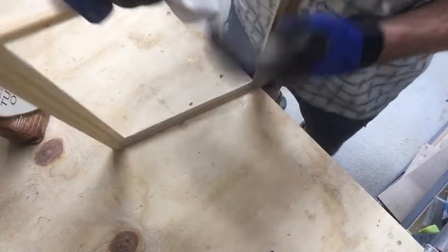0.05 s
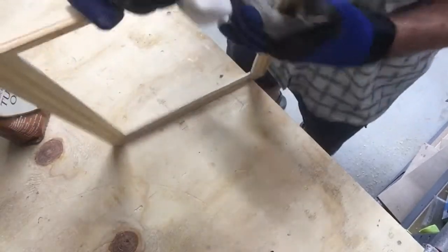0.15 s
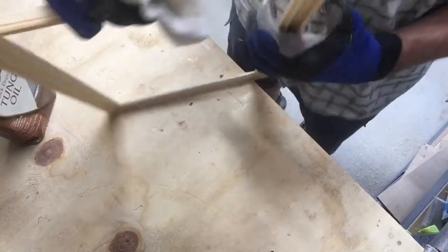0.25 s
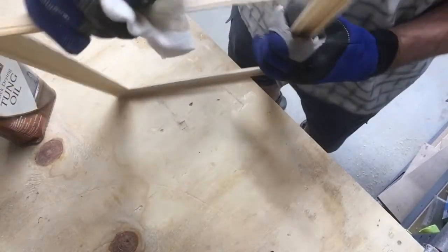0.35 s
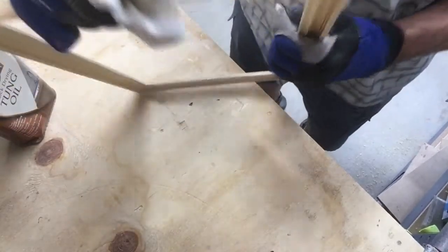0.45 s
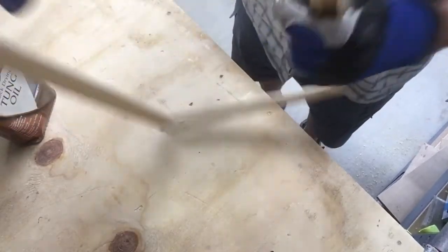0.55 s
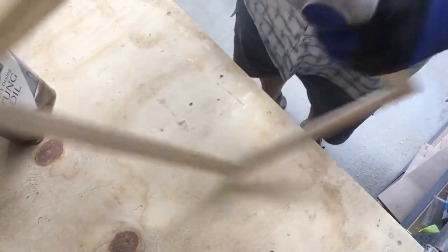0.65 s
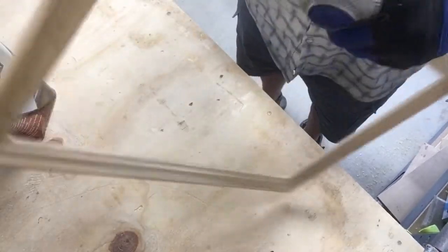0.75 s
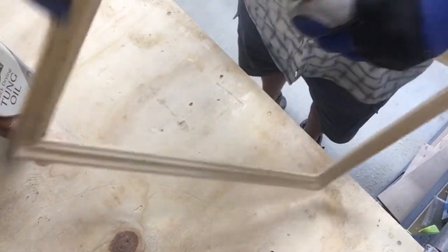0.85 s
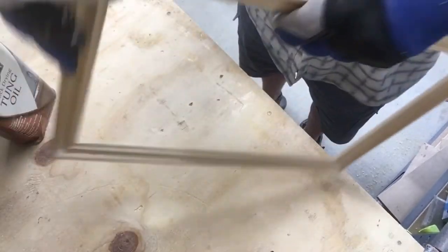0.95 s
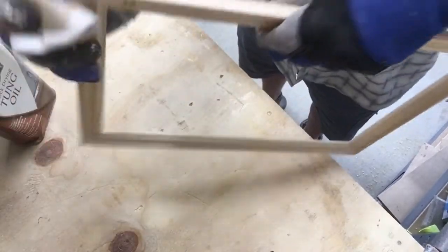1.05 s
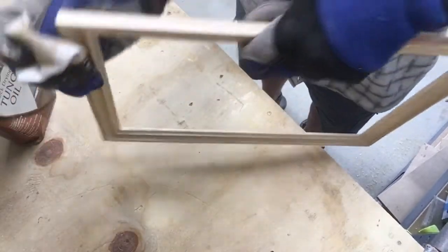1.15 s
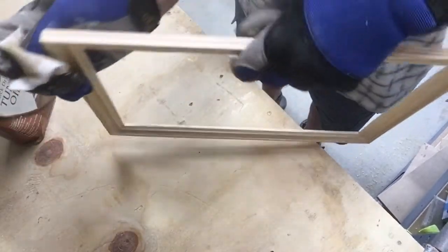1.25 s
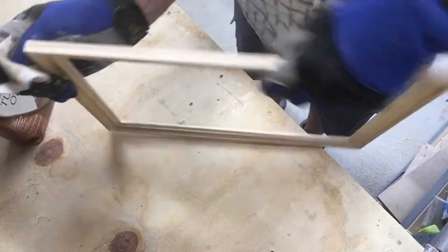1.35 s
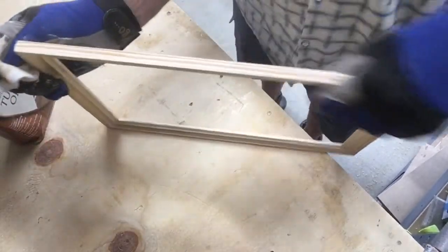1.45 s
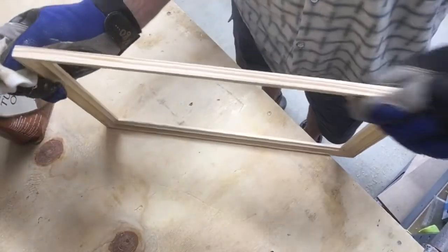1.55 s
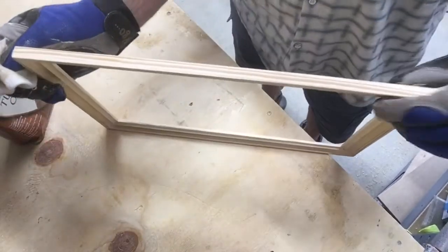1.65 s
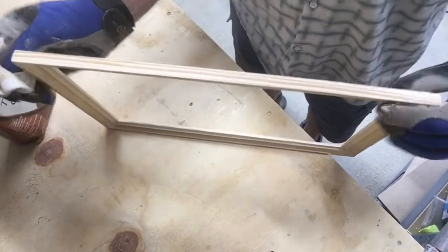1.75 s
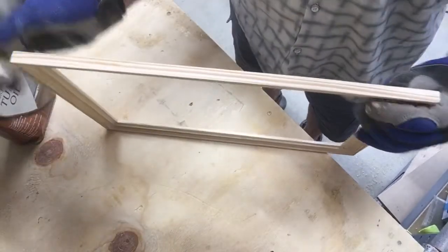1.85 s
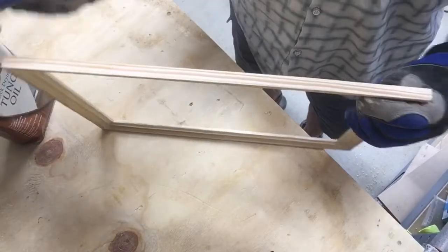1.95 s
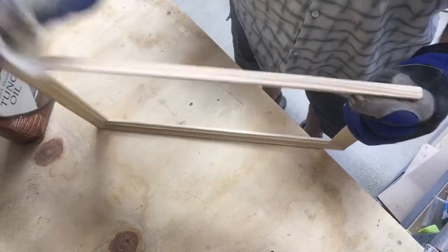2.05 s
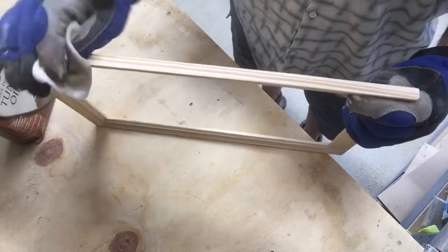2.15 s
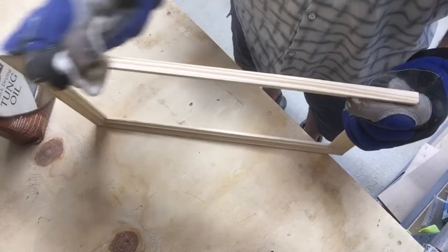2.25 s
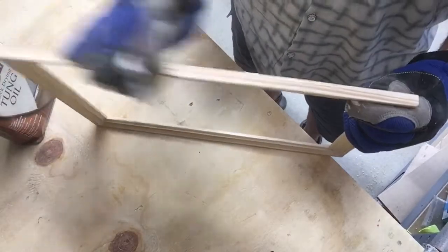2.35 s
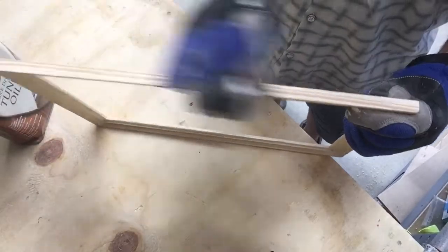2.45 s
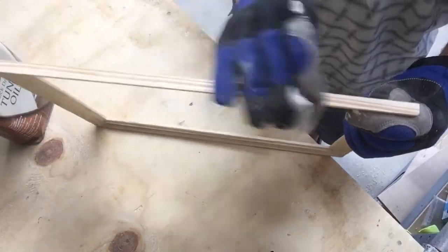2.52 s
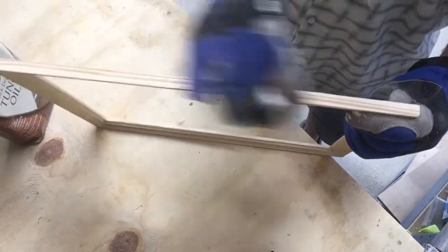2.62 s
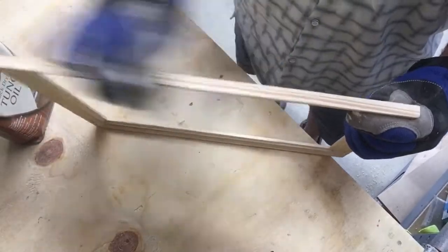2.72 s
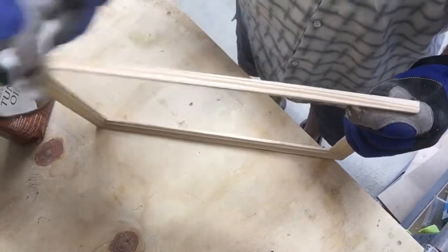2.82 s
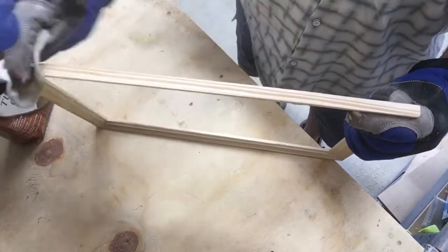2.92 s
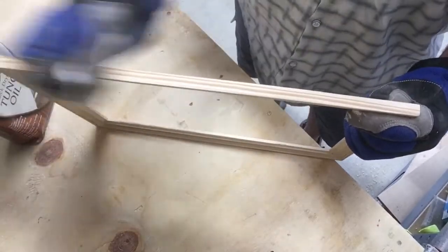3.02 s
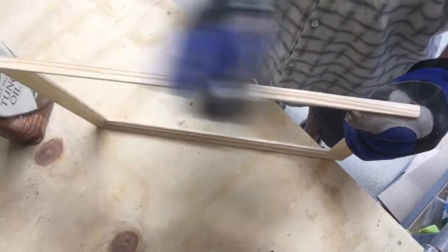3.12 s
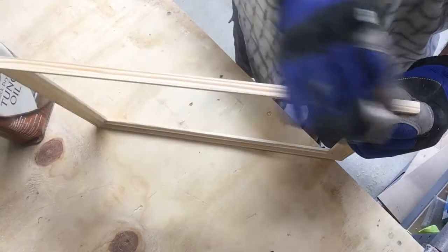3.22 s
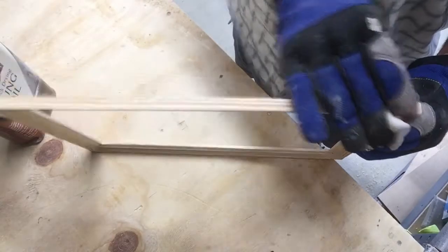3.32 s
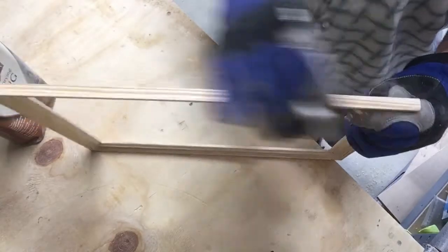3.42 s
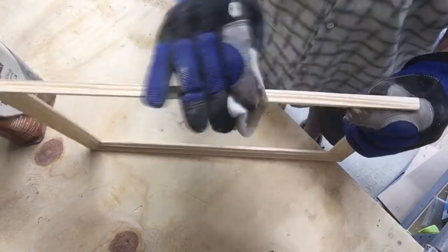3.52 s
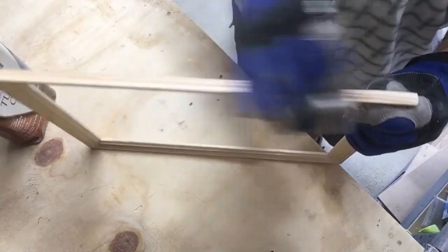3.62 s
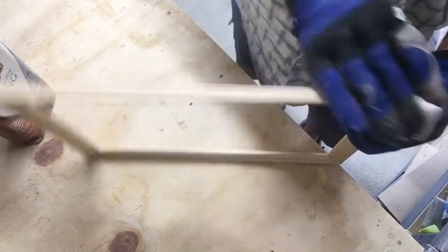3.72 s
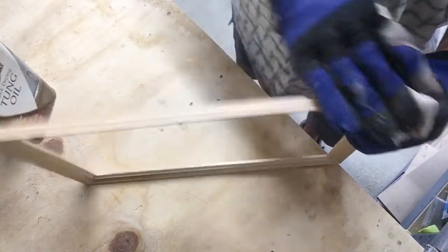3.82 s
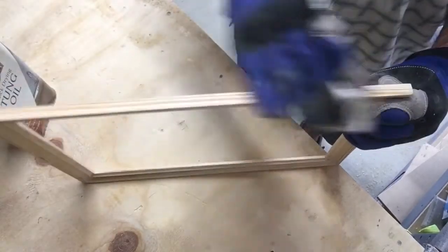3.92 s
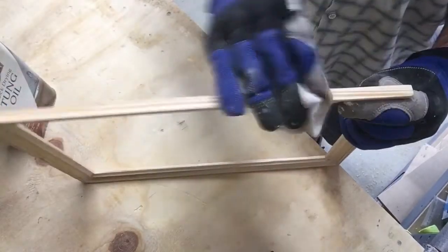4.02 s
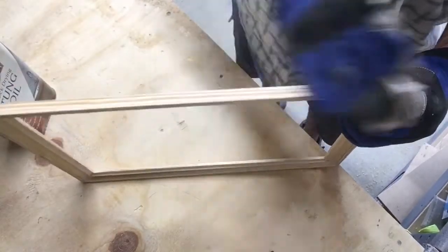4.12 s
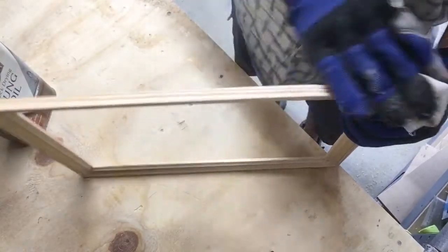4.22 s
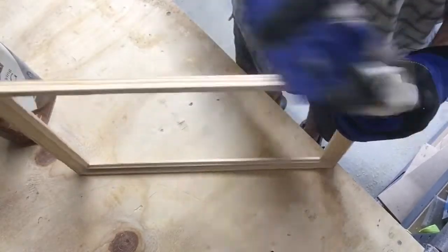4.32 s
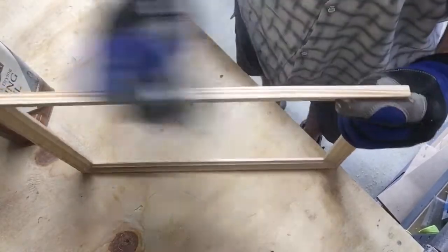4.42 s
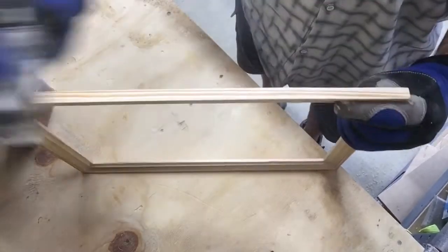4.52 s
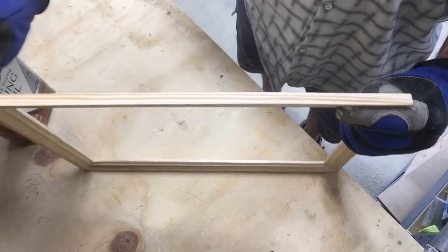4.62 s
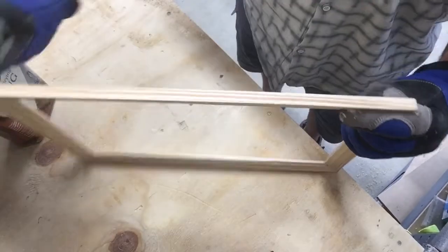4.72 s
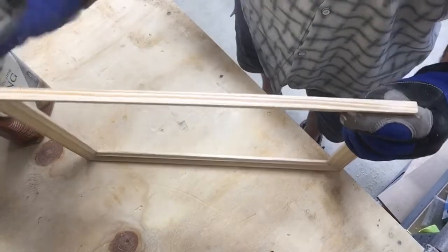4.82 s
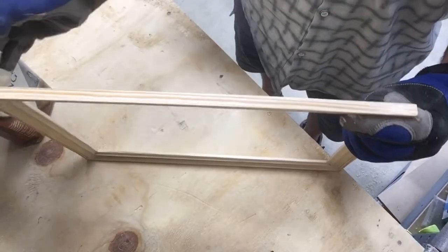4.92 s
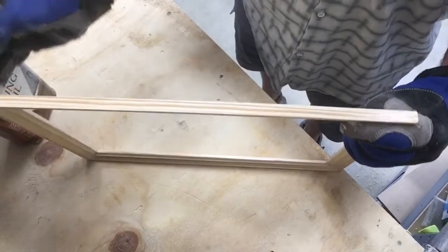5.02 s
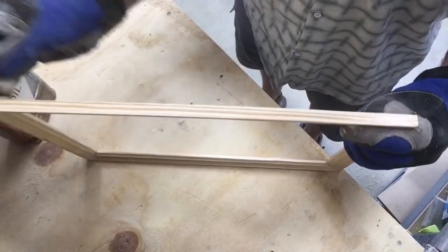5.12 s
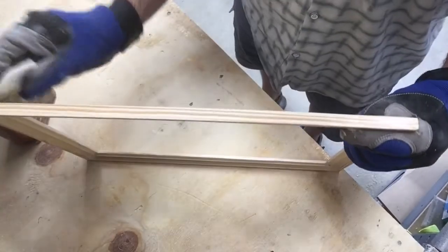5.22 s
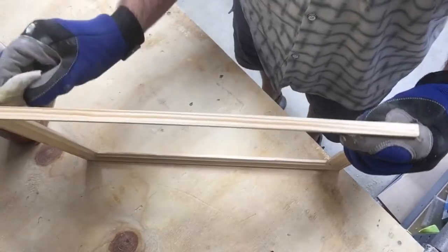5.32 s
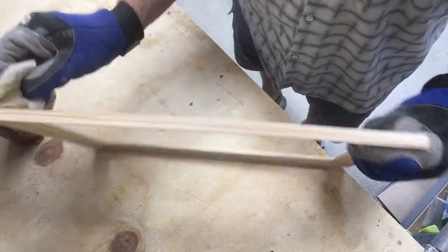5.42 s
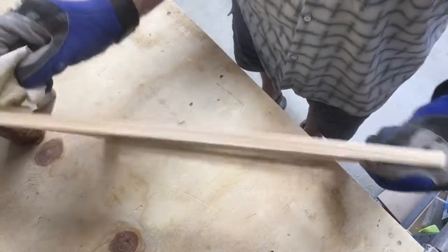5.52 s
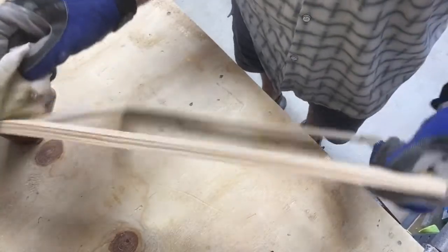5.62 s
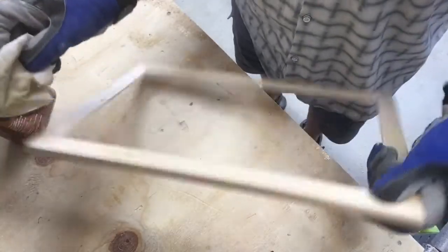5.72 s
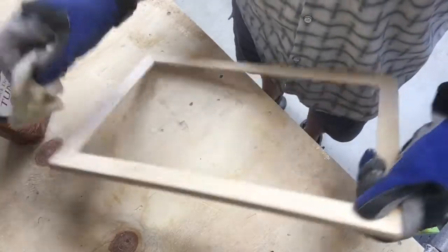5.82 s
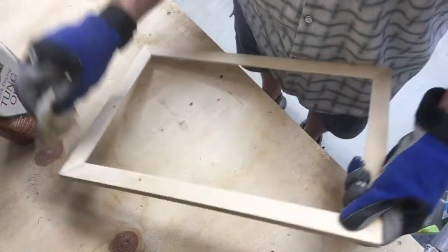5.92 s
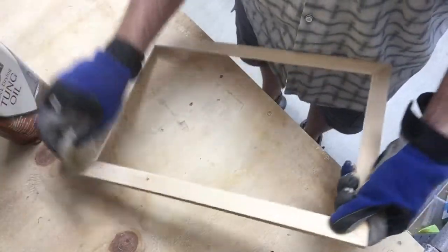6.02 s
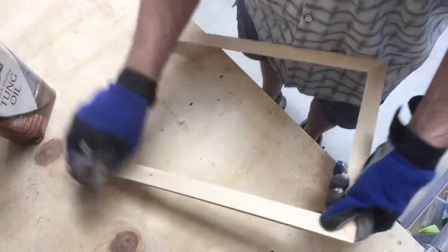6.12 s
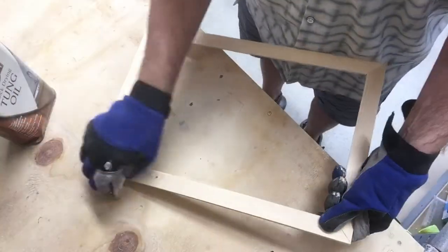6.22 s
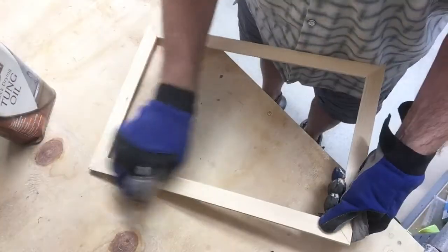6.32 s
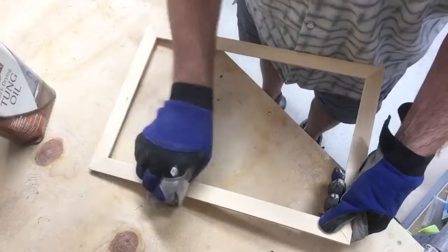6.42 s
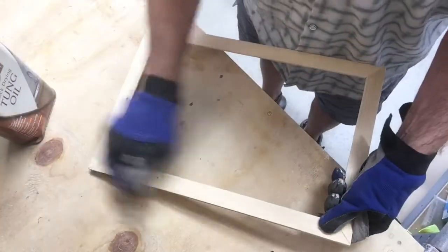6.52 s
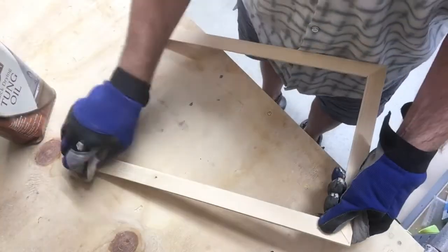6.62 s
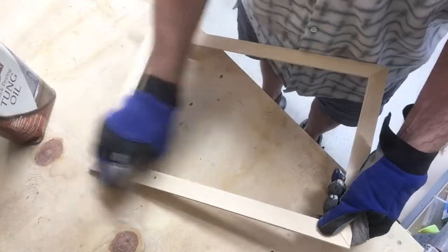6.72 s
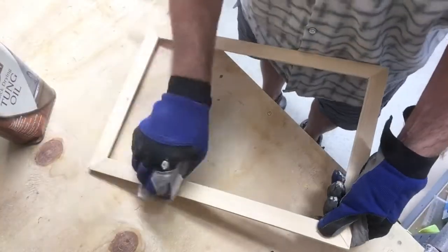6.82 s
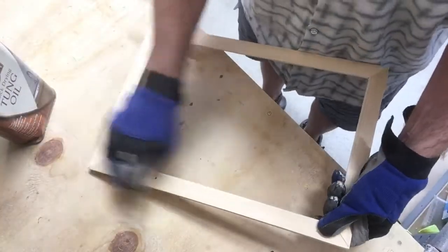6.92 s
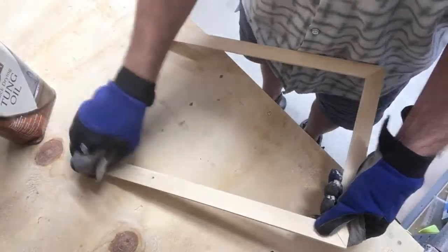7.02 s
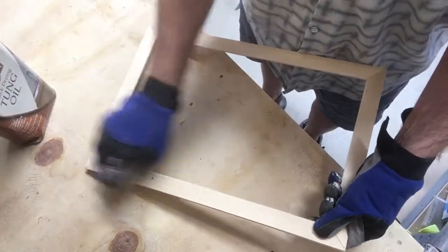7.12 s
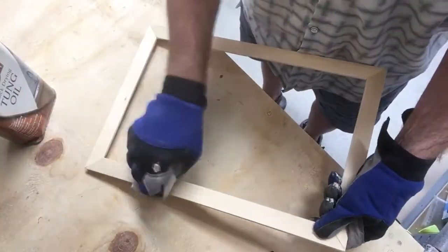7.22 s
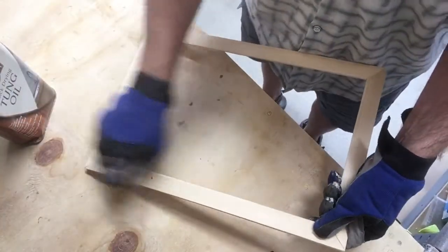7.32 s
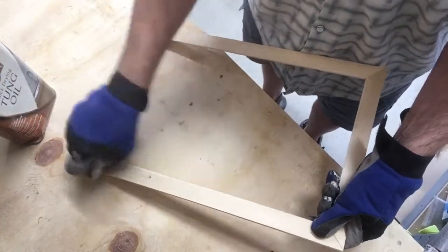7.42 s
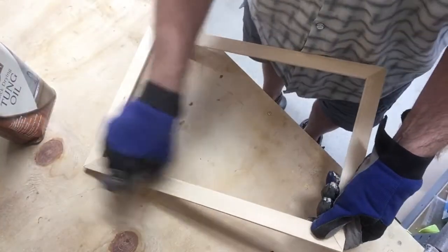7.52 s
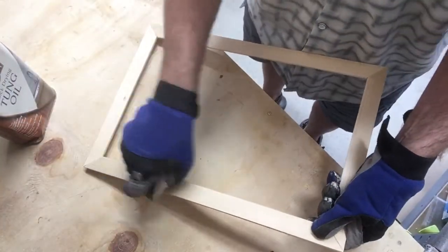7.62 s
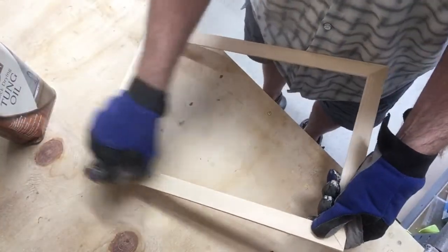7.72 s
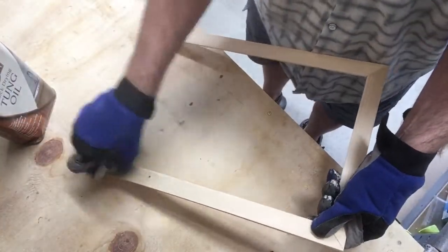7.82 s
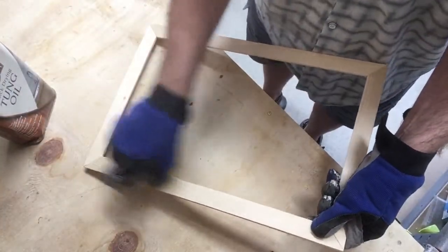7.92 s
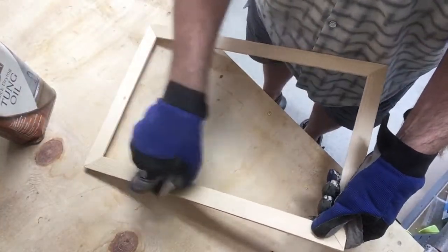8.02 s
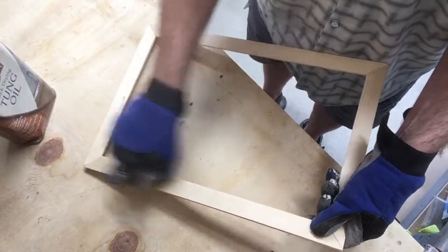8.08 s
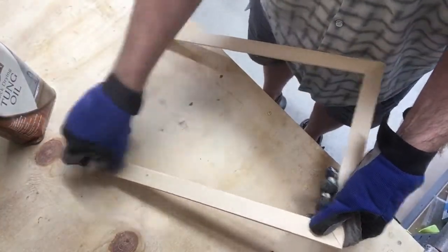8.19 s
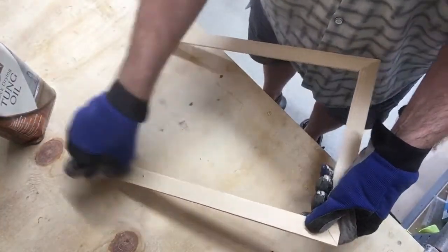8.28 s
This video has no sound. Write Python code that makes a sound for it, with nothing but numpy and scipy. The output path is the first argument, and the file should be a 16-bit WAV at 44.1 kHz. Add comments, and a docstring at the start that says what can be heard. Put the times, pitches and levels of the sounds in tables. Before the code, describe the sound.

A light wooden frame clatters and scrapes on a plywood bench while a rag wipes it, slow strokes at first, then brisk back-and-forth rubbing.

```python
"""Wooden knocks and a scraping slide come first; then a gloved hand wipes an oily rag to and fro along a
light wooden frame on a plywood bench. Rag, drag and narrow bands are noise shaped by filters and resonances.
The frame knocks on the bench as it is turned, each knock a burst of decaying modes; the bench booms under it.
A quiet workshop answers well under the direct sound, over still air and a low wavering drone."""
import sys
import numpy as np
from scipy import signal
from scipy.fft import rfft, irfft, next_fast_len
from scipy.io import wavfile
from scipy.ndimage import uniform_filter1d, map_coordinates

SR = 44100
rng = np.random.default_rng(int(sys.argv[2]) if len(sys.argv) > 2 else 0)


def elevation(decibels):
    """Turn decibel levels (scalar or array-like) into linear amplitude ratios."""
    levels = np.asarray(decibels, float)
    return 10 ** (levels / 20)


def master_out(mix):
    """Clip the mix to full scale and print it as 16-bit PCM to the path in sys.argv[1]."""
    frames = np.transpose(np.atleast_2d(mix))
    ceiling = np.clip(frames, -1, 1)
    pcm = np.round(ceiling * 32767).astype(np.int16)
    wavfile.write(sys.argv[1], SR, pcm)


N = 368235  # samples

# modes of the plywood bench top, lowest first: pitch_hz [Hz], level_db [dB], t60_s [s]
TOP_MODES = [(64.7, -21, 0.54), (185, 0, 0.17), (242.5, -13, 0.31), (273.2, 5.5, 0.041), (288.2, 1.5, 0.11),
             (308.5, -6, 0.12), (341, -8, 0.1), (411.7, -8.5, 0.19)]
# modes of the frame's struck corner: pitch_hz [Hz], level_db [dB], t60_s [s]
CORNER_MODES = [(443, -4.5, 0.046), (534.5, 4.5, 0.053), (590, 6, 0.058), (611, 2.5, 0.067),
                (755, 1.5, 0.062), (832, 3, 0.067)]
# modes of the frame's bars: pitch_hz [Hz], level_db [dB], t60_s [s]
FRAME_MODES = [(941.5, 0.5, 0.078), (1051, -7, 0.055), (1175, -2.5, 0.032), (1420, -5.5, 0.021),
               (1578, 0, 0.035), (1695, -4, 0.053), (1778, -1.5, 0.035), (1955, -14, 0.017),
               (1926, -1.5, 0.0097), (2175, 0, 0.028), (2344, -9.5, 0.034), (2840, -14.5, 0.015),
               (3134, -5, 0.047), (3740, -5.5, 0.016), (4070, -2, 0.015)]
# strokes of the rag along a bar: start_s [s], length_s [s], level_db [dB, midway], swell_db [dB, start to end]
WIPE_STROKES = [(2.17, .33, -46, 9), (2.577, 0.22, -43, 0.5), (2.925, 0.3, -43, 1),
                (3.319, 0.16, -45, -1.5), (3.525, 0.16, -45, 5), (3.801, 0.15, -45, -0.5),
                (4.02, 0.12, -45.5, -3), (4.245, 0.32, -42, 1.5), (6.257, 0.14, -46.5, 8),
                (6.48, 0.12, -40.5, 4.5), (6.657, 0.15, -41.5, -3.5), (6.872, 0.13, -41, 4.5),
                (7.064, .14, -42.5, 1.5), (7.275, 0.12, -41.5, 1.5), (7.451, .14, -43, -5),
                (7.653, .12, -43, 3), (7.844, 0.15, -44, 0.5), (8.049, 0.12, -42.5, 3),
                (8.279, 0.074, -45, 1)]

LAID_FLAT_S = 5.8  # the frame stands on edge before, lies flat after
TOP_LOW_HZ = 174  # the top radiates little below this
STOP_DB = -18  # level just after a movement stops, against its end


def unit(x):
    """Scaled to rms 1."""
    return x / np.sqrt(np.mean(x ** 2) + 1e-20)


def along(points, hz):
    """(Hz, value) points read on a log frequency axis."""
    f, v = np.transpose(points)
    return np.interp(np.log(hz + 1), np.log(f + 1), v)


def wobble(rate):
    """A smooth random curve, rate knots a second."""
    knots = rng.standard_normal(int(N * rate / SR) + 4)
    return map_coordinates(knots, [np.arange(N) * rate / SR])


def filtered(x, response):
    """x times a complex response of frequency."""
    m = next_fast_len(N + SR // 2)
    return irfft(rfft(x, m) * response(np.fft.rfftfreq(m, 1 / SR)), m)[:N]


def resonant(modes, damping):
    """Response of a body under steady friction; damping multiplies the free bandwidth of its modes."""
    def response(f):
        total = 0
        for k, (hz, db, t60) in enumerate(modes):
            width = damping * np.log(1000) / np.pi / t60
            total = total + (-1) ** k * elevation(db) * 1j * f * width / (hz * hz - f * f + 1j * f * width)
        return total
    return response


def friction(grain_db, patchy_db):
    """Many tiny slips of uneven size; narrow bands swell and fade as the contact moves along the wood."""
    slips = rng.standard_normal(N) * elevation(grain_db * wobble(1500))
    z = signal.stft(slips, nperseg=1024)[2]
    field = uniform_filter1d(rng.standard_normal(z.shape), size=4, axis=0)
    field = uniform_filter1d(field, size=6, axis=1)
    return signal.istft(z * elevation(patchy_db * unit(field)), nperseg=1024)[1][:N]


def strokes(rows, slower=1, stop_db=STOP_DB):
    """Amplitude of a table of movements: each speeds up, travels, slows to a stop and rustles on faintly."""
    rise_s, stop_s, rustle_s = 0.012 * slower, 0.047 * slower, 0.66
    arch_db, silent_db = 3, -36  # midway over the ends; before the rise, under the start
    power, t = 0, np.arange(0, N / SR, 0.001)
    for start, length, db, swell_db in rows:
        rise, stop = min(rise_s, length / 3), min(stop_s, length * 2.6)
        first, last = db - swell_db / 2 - arch_db, db + swell_db / 2 - arch_db
        times = start + np.array([-3 * rise, 0, length / 2, length, length + stop, length + stop + rustle_s])
        levels = [first + silent_db, first, db, last, last + stop_db, last + stop_db - 39]
        power += elevation(np.interp(t, times, levels, left=-120, right=-120)) ** 2
    return np.interp(np.arange(N) / SR, t, np.sqrt(power))


def shop(x):
    """The workshop's answer: delayed noise in which each frequency dies at its own speed."""
    # decay of the room: frequency_hz [Hz], t60_s [s]
    room_decay = [(200, 0.33), (2000, 0.15), (10000, 0.055)]
    hz, t, z = signal.stft(rng.standard_normal(SR // 2), SR, nperseg=256)
    tail = signal.istft(z * elevation(-60 * t / along(room_decay, hz)[:, None]), SR, nperseg=256)[1]
    late = np.pad(x, (300, 0))  # samples
    return signal.fftconvolve(late, tail / np.linalg.norm(tail))[:len(x)]


def still_air():
    """The room's still air: steady noise with a fixed spectrum."""
    # spectrum of the air: frequency_hz [Hz], level_db [dB, relative]
    air_spectrum = [(25, -14.5), (84, -2.5), (145, -17.5), (317, -14), (600, -21), (1100, -20.5),
                    (2500, -23.5), (4500, -28.5), (8000, -35.5), (16000, -42)]
    noise = filtered(rng.standard_normal(N), lambda f: elevation(along(air_spectrum, f)))
    return elevation(-61) * unit(noise)


def sway():
    """The lowest bench mode hums at each shove; a deeper, wavering drone comes and goes below it."""
    # shoves that set the bench swaying: start_s [s], length_s [s], level_db [dB, midway]
    shoves = [(-0.007, 0.089, -40.5), (0.33, 0.17, -53), (1.362, 0.18, -46), (2.037, 0.164, -53.5),
              (2.888, 0.077, -54), (3.051, 0.036, -60), (3.135, 0.11, -60), (3.3, 0.33, -50),
              (3.771, 0.19, -48), (4.058, 0.027, -48), (4.11, 0.039, -50), (4.229, 0.15, -42),
              (4.508, 0.039, -61), (4.597, 0.34, -51), (5.227, 0.044, -57), (5.406, 0.044, -53),
              (5.825, 0.25, -43.5), (6.15, 0.19, -50), (6.996, 0.12, -58), (8.19, 0.035, -54)]
    # swells of the drone: start_s [s], length_s [s], level_db [dB, midway], swell_db [dB, start to end]
    drones = [(.7, 0.21, -60, 4), (2.9, .1, -58, -4), (3.3, 0.29, -63, 2), (4.25, .2, -59, -2),
              (5.1, 0.6, -54, 0), (5.9, .25, -45, -4), (6.3, 0.47, -47.5, -3)]
    hum_rest_db, drone_rest_db = -66, -77
    shove_fade_db = -9.5  # from start to end of a shove
    hum_size = elevation(hum_rest_db) + strokes([(*row, shove_fade_db) for row in shoves], slower=1.45)
    drone_size = elevation(drone_rest_db) + strokes(drones, slower=5.1)
    hum_hz = TOP_MODES[0][0] + 2.38 * wobble(7.1)
    hum = np.sin(2 * np.pi * np.cumsum(hum_hz) / SR) * elevation(3.1 * wobble(6.8))
    drone_hz = 33 + 1.25 * wobble(1.7)
    drone = np.sin(2 * np.pi * np.cumsum(drone_hz) / SR) * elevation(1.2 * wobble(4.6))
    return hum_size * unit(hum) + drone_size * unit(drone)


def narrow_bands():
    """Narrow bands of noise: high squeaks, soft low thumps and the dull ends of strokes."""
    # narrow bands: start_s [s], length_s [s], level_db [dB, midway], pitch_hz [Hz]
    band_table = [(.048, 0.052, -42.5, 2100), (0.062, 0.034, -42.5, 4270), (0.205, 0.038, -47, 4060),
                  (.285, 0.032, -47, 3300), (.335, 0.032, -53, 2200), (3.284, 0.095, -44.5, 185),
                  (4.67, 0.056, -41, 185), (4.553, .015, -55, 1180), (4.574, .01, -46, 1550),
                  (5.35, 0.047, -56, 2700)]
    half_width = 0.038  # over the pitch
    noise = rng.standard_normal(N)
    out = np.zeros(N)
    for start, length, db, hz in band_table:
        tone = filtered(noise, lambda f: 1 / (1 + ((f - hz) / (half_width * hz)) ** 4))
        out += strokes([(start, length, db, 0)], slower=0.32, stop_db=-40) * unit(tone)
    return out


def drag():
    """Wood juddering on wood drives the modes of bench top and frame."""
    # the frame sliding and rocking: start_s [s], length_s [s], level_db [dB, midway], swell_db [dB, start to end]
    slide_table = [(0, 0.034, -30, -15), (.07, 0.06, -33, -9), (.17, 0.18, -29, -17), (.35, 0.032, -46, -5),
                   (1.42, 0.052, -43.5, 7.5), (1.85, 0.17, -49.5, 5.5), (2.1, 0.15, -50, -8),
                   (2.89, 0.028, -53, -16), (3.28, 0.34, -60.5, -25), (4.56, 0.24, -49.5, 3.5),
                   (5.2, 0.11, -55, 4), (5.34, 0.052, -46, -2), (5.95, 0.05, -38.5, 5),
                   (6.06, 0.092, -48.5, 1), (8.18, 0.045, -49, 4), (8.32, 0.035, -49, 17)]
    slide_scrape_db = -16.5  # frame under bench top in a slide
    wipe_drag_db, wipe_scrape_db = -15, -18.5  # top and frame under the wiping that rocks the frame
    flat_db = -4.5  # lying flat, the frame rocks less
    judder_db, judder_hz = 2, 25
    slides = strokes(slide_table, slower=2.05)
    lying = np.arange(N) >= LAID_FLAT_S * SR
    wipes = strokes(WIPE_STROKES) * elevation(np.where(lying, flat_db, 0))
    drag_size = slides + elevation(wipe_drag_db) * wipes
    scrape_size = elevation(slide_scrape_db) * slides + elevation(wipe_scrape_db) * wipes

    top = filtered(friction(grain_db=-0.5, patchy_db=4.0), resonant(TOP_MODES[1:], damping=0.85))
    # a second, more damped pass brings the same modes out further
    top = filtered(top, resonant(TOP_MODES[1:], damping=3.56))
    top = filtered(top, lambda f: 1 / (1 + (TOP_LOW_HZ / (f + 1)) ** 8))
    top = elevation(judder_db * wobble(judder_hz)) * top
    frame_modes = CORNER_MODES + FRAME_MODES[:4]
    frame = filtered(friction(grain_db=4.0, patchy_db=-1.0), resonant(frame_modes, damping=7.5))
    frame = elevation(1.1 * wobble(35)) * frame
    return drag_size * unit(top) + scrape_size * unit(frame)


def peak(x):
    """Scaled to a peak of 1."""
    return x / np.max(abs(x))


def band(x, lo_hz, hi_hz):
    """x through a gentle band-pass."""
    return signal.sosfilt(signal.butter(2, [lo_hz, hi_hz], "band", fs=SR, output="sos"), x)


def ring(modes, push):
    """Decaying modes struck by a push; each mode's strength and pitch vary a little at random from knock to knock."""
    t = np.arange(SR // 3) / SR
    spread_db, detune = 2.5, 0.007  # detune is a fraction of the pitch
    tones = 0
    for hz, db, t60 in modes:
        decay = elevation(db + rng.normal(0, spread_db) - 60 * t / t60)
        tones = tones + decay * np.sin(2 * np.pi * hz * rng.normal(1, detune) * t)
    return signal.fftconvolve(tones, push)


def knocks():
    """Each contact chatters for some ms, rings the bodies at new strengths, clacks and cracks; the room answers."""
    # knocks: start_s [s], top_db [dB], corner_db [dB, before a 3.5 dB lift], frame_db [dB, before a 5 dB lift],
    # chatter_ms [ms]
    knock_table = [(0.002, -24, -41, -53, 13), (0.067, -37, -34, -44, 6.7), (0.157, -16.5, -30, -31, 9.2),
                   (0.194, -17.5, -50, -38, 4.1), (.352, -28, -64, -51, 6.7), (1.35, -17.5, -19, -32, 2),
                   (1.369, -15.5, -37, -56, 4.5), (1.387, -21, -42, -58, 4.5), (1.41, -13, -24.5, -32, 4.1),
                   (1.442, -26.5, -40, -43, 12), (1.873, -44, -67, -55, 4.5), (1.905, -48, -71, -54, 3.3),
                   (1.94, -37.5, -70, -50, 2.7), (1.971, -45, -68, -60, 4.3), (2.102, -39, -54, -52, 4.4),
                   (2.262, -52, -49, -64, 12), (2.75, -47, -46, -66, 22), (2.869, -55, -35, -64, 1.3),
                   (2.882, -33.5, -51, -66, 35), (3.272, -43, -41.5, -41, 15),
                   (3.774, -10.5, -21.5, -26.5, 7.4), (3.819, -21, -46, -38, 10),
                   (4.221, -15, -27, -34.5, 6.1), (4.563, -44, -62, -52, 3.4),
                   (4.598, -33.5, -42, -49, 5.1), (4.651, -30, -46, -51, 7.3), (4.748, -51, -41, -45, 50),
                   (5.144, -60, -72, -48, 2.2), (5.341, -46, -71, -52, 88), (5.807, -16.5, -29.5, -23, 4.9),
                   (5.817, -19, -35, -38, 5.9), (5.866, -22, -38, -38.5, 7.5), (5.952, -32.5, -47, -39, 30),
                   (5.977, -27.5, -47, -37, 13), (5.997, -30, -49, -38, 17),
                   (6.157, -10.5, -22, -7.5, 11.5), (6.579, -41.5, -49, -41, 34),
                   (6.975, -41.5, -61, -38, 60), (8.191, -42.5, -56, -37, 47)]
    # short thuds through the bench legs: pitch_hz [Hz], level_db [dB], t60_s [s]
    leg_modes = [(85, 2, 0.15), (102, 5, 0.098), (121, -1, 0.1)]
    crack_db, thud_db = -20, -23.5  # under the bench top
    boom_db, boom_grows = -40, 0.46  # a harder blow booms only a little louder
    out = np.zeros(N + 2 * SR)
    short = np.arange(SR // 20) / SR
    size = SR // 3 + len(short) - 1
    t = np.arange(size) / SR
    for start, top_db, corner_db, frame_db, ms in knock_table:
        hits = rng.standard_normal(len(short)) * (rng.random(len(short)) < 0.02)
        bounces = hits * np.exp(-(short * 1000 / ms) ** 4)
        push = np.exp(-short / 0.0038) + 6.5 * bounces
        corner_push = np.exp(-short / 0.00052) + bounces
        tap = np.exp(-short / 0.00004) + 1.3 * bounces
        noise = rng.standard_normal(size)
        after = np.maximum(t - ms / 1000, 0)  # noise is steady while it chatters

        top = band(band(ring(TOP_MODES[1:], push), 180, 1160), 185, 750)
        body = elevation(top_db) * peak(band(top, TOP_LOW_HZ, 2000))
        # many short modes blur into a dense clack between the clear ones
        corner = peak(band(ring(CORNER_MODES, corner_push), 470, 1400))
        corner_clack = peak(band(noise * elevation(-60 * after / 0.13), 520, 1130))
        body += elevation(corner_db + 3.5) * (corner + 0.37 * corner_clack)
        frame = peak(band(band(ring(FRAME_MODES, tap), 940, 4000), 810, 5400))
        frame_clack = peak(band(noise * elevation(-60 * after / 0.0094), 1730, 2960))
        body += elevation(frame_db + 5) * (frame + 0.39 * frame_clack)
        crack = noise * elevation(-60 * t / 0.0043)
        body += elevation(top_db + crack_db) * peak(band(crack, 2000, 6700))
        # the whole bench booms on its legs
        boom = ring(TOP_MODES[:1], short * np.exp(-short / 0.0033))
        body += elevation(boom_db + boom_grows * top_db) * peak(boom)
        thud = ring(leg_modes, short * np.exp(-short / 0.0038))
        body += elevation(top_db + thud_db) * peak(band(thud, 70, 136))

        echo = shop(elevation(-12) * np.pad(body, (0, SR // 5)))
        at = round(start * SR)
        out[at:at + len(body)] += body
        out[at:at + len(echo)] += echo
    return out[:N]


def rag():
    """Cloth on wood: a broad rub coloured by the frame's modes, and a finer hiss of fibres."""
    # gloves brushing, shifting grip, and the faint start of a wipe:
    # start_s [s], length_s [s], level_db [dB, midway], swell_db [dB, start to end]
    brush_table = [(0, 0.025, -55, -8), (.05, 0.048, -38, 12.5), (.156, 0.17, -37, -9.5),
                   (.327, .14, -49.5, 2), (.516, 0.1, -51, 1), (.644, 0.006, -48, 11),
                   (.671, 0.0042, -46, 7), (.778, 0.014, -45, -4), (.846, 0.016, -48, 5),
                   (.9, 0.078, -63, 11), (.984, 0.024, -54.5, -1), (1.03, 0.26, -52, -8),
                   (1.084, 0.007, -42, -3), (1.349, 0.25, -48, -7), (1.63, 0.061, -53.5, 10),
                   (1.716, 0.023, -45, -13), (1.752, 0.16, -60.5, -7), (1.885, .18, -56, 12),
                   (2.104, 0.054, -52.5, -5), (3.272, 0.021, -38.5, -5.5), (3.755, 0.02, -46.5, 5),
                   (4.153, 0.0018, -46, 21), (4.655, 0.0069, -54.5, -19), (4.74, 0.065, -52, -8),
                   (5.01, 0.01, -63, -7), (5.144, 0.0058, -49, -12), (5.155, 0.04, -57, -7),
                   (5.203, 0.13, -55, -7), (5.345, 0.048, -51.5, 5), (5.585, 0.014, -55.5, -4),
                   (5.645, 0.013, -51.5, 3), (5.696, 0.011, -54, -4), (5.817, 0.016, -45.5, -15),
                   (5.87, 0.15, -48, 1), (6.047, 0.052, -50.5, 3), (6.105, 0.045, -51.5, 3),
                   (6.2, 0.11, -48, 8), (8.183, 0.075, -42.5, -10.5)]
    # rub while the frame stands on edge, before its modes colour it: frequency_hz [Hz], density_db [dB per Hz]
    edge_colour = [(410, -56), (700, -13.5), (1140, -3), (2240, -0.5), (2480, 5.5), (4950, -1),
                   (6800, -5.5), (8000, -10.5), (10400, -20), (17600, -120)]
    # rub once it lies flat, before its modes colour it: frequency_hz [Hz], density_db [dB per Hz]
    flat_colour = [(410, -42), (700, -32), (931, -8.5), (1630, -4), (2000, -8.5), (2690, 3), (3330, -0.5),
                   (4080, 0), (4900, -4), (8000, -11), (10400, -53), (17600, -120)]
    # hiss of the fibres, before a low cut: frequency_hz [Hz], density_db [dB per Hz]
    fibre_colour = [(2940, -32), (5000, 6.5), (6830, 3), (7670, -5), (8670, -2.5), (11700, -6.5),
                    (15100, -8.5), (16000, -20)]
    wipe_hiss_db, flat_hiss_db, brush_hiss_db = -2.5, -5.5, -11.5  # against the rubbing
    hiss_stop_db = -27.5  # the fibres fall silent sooner than the rub
    lying = np.arange(N) >= LAID_FLAT_S * SR
    rub_size = np.hypot(strokes(WIPE_STROKES), strokes(brush_table))
    wipe_hiss = strokes(WIPE_STROKES, stop_db=hiss_stop_db) * elevation(np.where(lying, flat_hiss_db, wipe_hiss_db))
    brush_hiss = strokes(brush_table, stop_db=hiss_stop_db) * elevation(brush_hiss_db)
    hiss_size = np.hypot(wipe_hiss, brush_hiss)

    wood = resonant(FRAME_MODES, damping=0.82)
    slips = friction(grain_db=1.5, patchy_db=2.5)
    upright = unit(filtered(slips, lambda f: elevation(along(edge_colour, f)) * (1 + abs(wood(f)))))
    flat = unit(filtered(slips, lambda f: elevation(along(flat_colour, f)) * (1 + abs(wood(f)))))
    rub = np.where(lying, flat, upright)
    fibres = friction(grain_db=-0.5, patchy_db=3.5)
    hiss = filtered(fibres, lambda f: elevation(along(fibre_colour, f)) / (1 + (6000 / (f + 1)) ** 6))
    snags = elevation(1.04 * wobble(30))  # the cloth catches and lets go
    return snags * (rub_size * rub + hiss_size * unit(hiss))


def scene():
    """Work on the bench, its echo and the room's still air, in one channel."""
    wiping = rag() + drag() + narrow_bands()
    echo = shop(elevation(-14) * wiping)
    return (knocks() + wiping + echo + sway() + still_air())[None]


def band_limit(x):
    """A steep low-pass at the top of the band."""
    return signal.sosfilt(signal.butter(12, 15900, fs=SR, output="sos"), x)


def record(dry):
    """The microphone's input stage rounds off the loudest peaks."""
    ceiling = 0.76  # of full scale
    mix = dry / (1 + abs(dry / ceiling) ** 6) ** (1 / 6)
    return band_limit(mix)


dry = scene()
out = record(dry)
master_out(out)
```